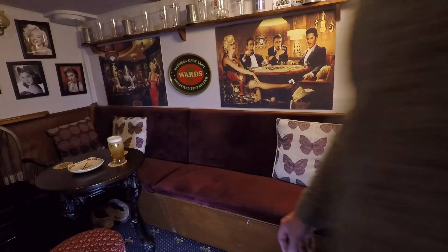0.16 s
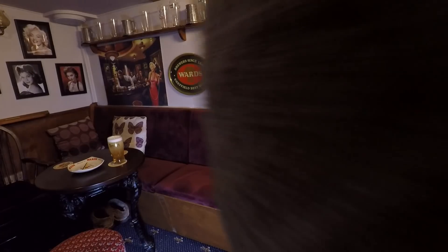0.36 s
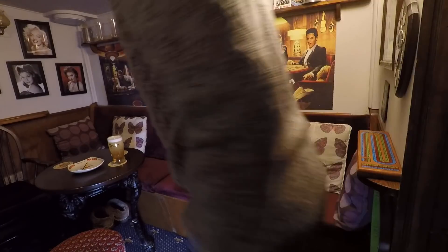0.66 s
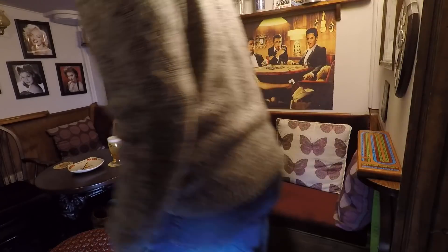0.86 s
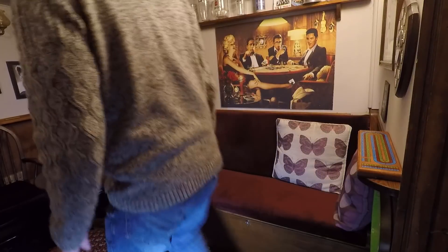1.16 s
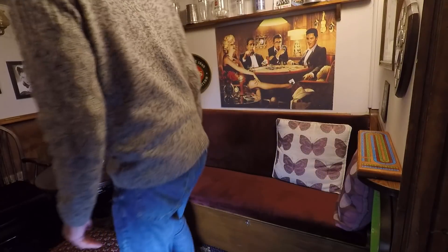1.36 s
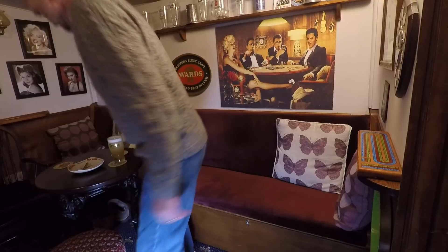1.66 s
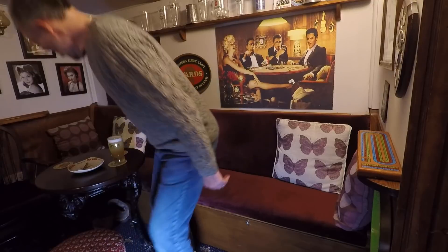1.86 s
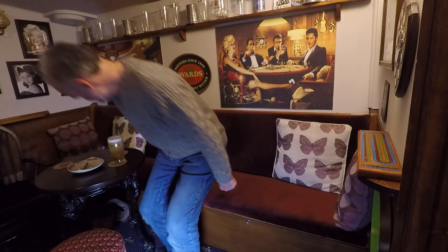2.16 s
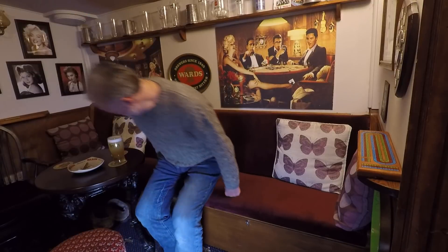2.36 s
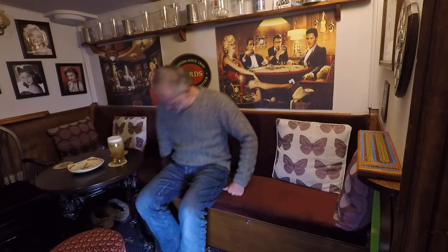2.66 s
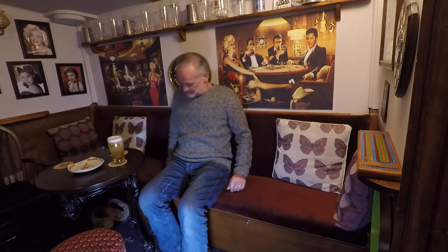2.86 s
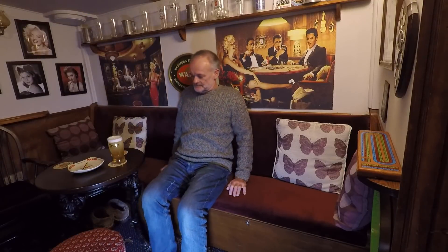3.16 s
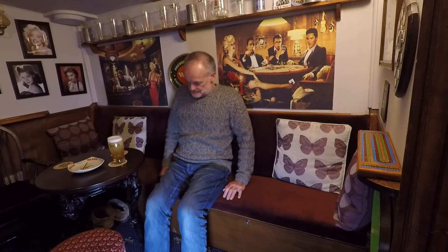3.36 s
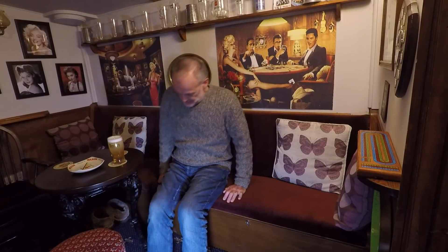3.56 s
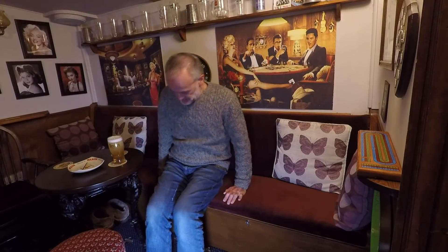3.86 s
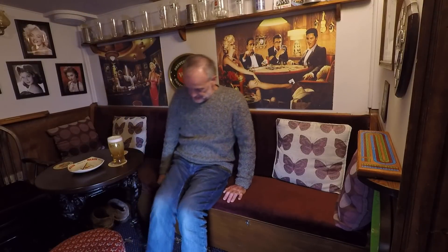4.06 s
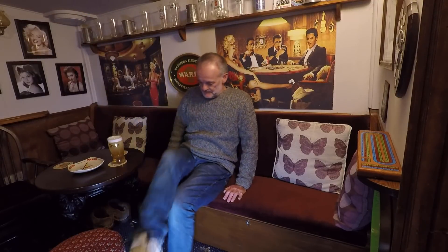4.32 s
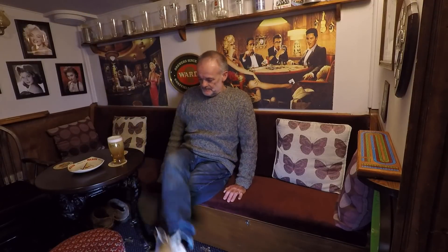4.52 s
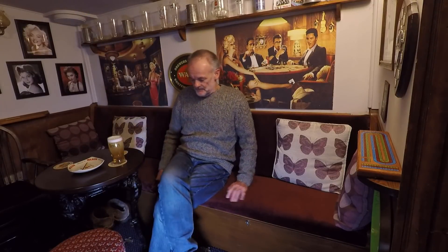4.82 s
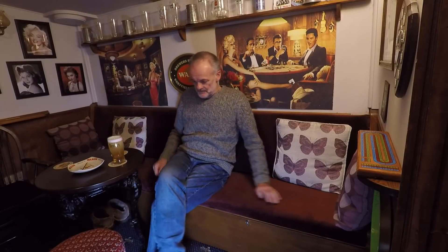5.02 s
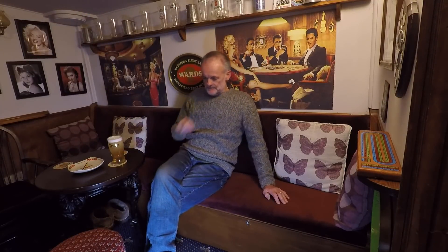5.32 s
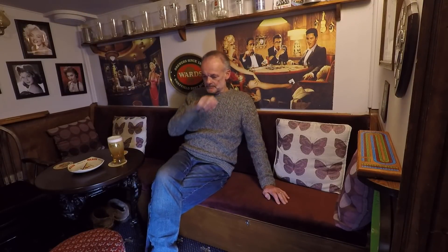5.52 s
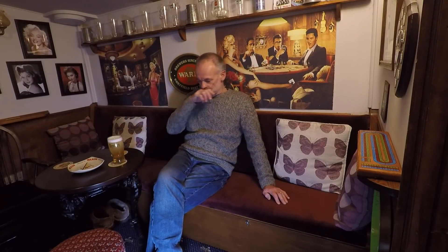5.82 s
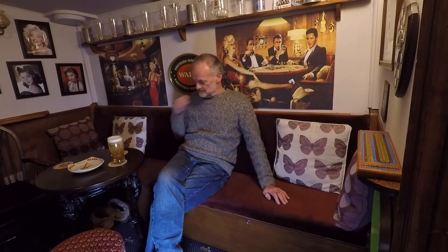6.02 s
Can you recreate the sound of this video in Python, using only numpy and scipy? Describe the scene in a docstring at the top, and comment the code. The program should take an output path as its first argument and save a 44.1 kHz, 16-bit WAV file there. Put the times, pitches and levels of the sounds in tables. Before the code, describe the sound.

In a small, muffled room, someone walks heavily over carpet, making the timber beneath knock and boom close to the microphone. They sit down on a cushioned wooden bench with a click and several deep, slightly overloaded thumps. Then their legs shift with softer knocks, cloth rustles, and a hand brushes briefly over velvet. A low hum, rumble and light hiss run throughout.

```python
"""Heavy steps on a carpeted, hollow timber floor; the walker drops onto a boxed bench and shifts his legs.
Each blow knocks the boards and booms the floor, out of phase at the two microphones.
Soles and cloth scuff, joints tick and creak, a hand rasps along the velvet seat.
Hum, rumble and microphone hiss lie underneath. The room is small and soft; the loudest booms clip."""
import sys
import numpy as np
from scipy import signal
from scipy.fft import rfft, irfft
from scipy.io import wavfile
from scipy.ndimage import uniform_filter1d

SR = 44100
rng = np.random.default_rng(int(sys.argv[2]) if len(sys.argv) > 2 else 0)


def transcribe(u):
    """Save the signal u as a 16-bit wav file named by the first command-line argument.

    u: samples, shape (n,) or (channels, n), limited to [-1, 1]; the rate is SR.
    q: integer samples, one column per channel.
    """
    v = np.clip(np.atleast_2d(u).T, -1, 1)
    q = np.round(v * 32767).astype(np.int16)
    wavfile.write(sys.argv[1], SR, q)


N = 272758
ANTIPHASE = np.array([[1], [-1]])


def undb(db):
    return 10 ** (np.asarray(db) / 20)


def unit_rms(x):
    return x / np.sqrt(np.mean(x ** 2))


def coloured(spectrum, tilt_db_per_oct=0.):
    """Unit-rms noise with a (frequency [Hz], density [dB]) spectrum, tilted about 2 kHz."""
    hz, db = np.transpose(spectrum)
    octave = np.log2(np.maximum(np.fft.rfftfreq(N, 1 / SR), 1))
    gain_db = np.interp(octave, np.log2(hz), db, left=-120, right=-120)
    gain_db += tilt_db_per_oct * (octave - np.log2(2000))
    return unit_rms(irfft(rfft(rng.standard_normal(N)) * undb(gain_db), N))


def wander(rate_hz):
    """Unit-rms ramps between random values."""
    hold = int(SR / rate_hz)
    steps = np.repeat(rng.standard_normal(N // hold + 1), hold)
    return unit_rms(uniform_filter1d(steps, hold)[:N])


def decay(t, t60_s):
    return np.exp(-np.log(1000) * t / t60_s)


def ring(t, hz, t60_s, phase_rad=0.):
    return np.sin(2 * np.pi * hz * t + phase_rad) * decay(t, t60_s)


def stereo(mid, side, correlation):
    """Left and right from two unrelated signals."""
    return np.sqrt((1 + correlation) / 2) * mid + np.sqrt((1 - correlation) / 2) * side * ANTIPHASE


def add(out, start_s, sound):
    i = int(start_s * SR)
    out[:, i:i + sound.shape[1]] += sound[:, :N - i]


def hiss():
    """Microphone hiss, wavering slightly."""
    # in-phase and antiphase spectra: (frequency [Hz], density [dB])
    mid_spectrum = [(76, -26), (130, -3), (200, -5), (380, -7), (650, -15), (1000, -17), (1700, -19.5),
                    (2300, -24), (3300, -25), (5000, -29.5), (6600, -25), (8500, -29), (11000, -32.5),
                    (13000, -41.5), (15000, -45)]
    side_spectrum = [(53, -40), (90, -16), (160, -6), (300, -13.5), (430, -14), (870, -15.5), (1230, -20),
                     (2000, -28), (3500, -39), (5000, -40), (6600, -32), (8500, -35.5), (11000, -39.5),
                     (13000, -48), (15000, -53)]
    mid = undb(-47 + 0.15 * wander(4.1)) * coloured(mid_spectrum)
    side = undb(-43.5 + 0.2 * wander(3.7)) * coloured(side_spectrum)
    return mid + side * ANTIPHASE


def hum(hz=47.6, width_hz=13):
    """Low tone in narrow-band noise, opposite at the two microphones."""
    # hum envelope: (time [s], level [dB])
    levels = [(0, -36), (.8, -28), (1.5, -29.5), (2.2, -30.5), (3, -29), (3.7, -30), (4.4, -37), (5, -33.5),
              (5.6, -30.5), (6.18, -42)]
    t, f = np.arange(N) / SR, np.fft.rfftfreq(N, 1 / SR)
    tone = np.sqrt(2) * np.sin(2 * np.pi * hz * t)
    band = irfft(rfft(rng.standard_normal(N)) / (1 + (2 * (f - hz) / width_hz) ** 2), N)
    return (tone + 0.9 * unit_rms(band)) * undb(np.interp(t, *np.transpose(levels))) * ANTIPHASE


def rumble():
    """The floor rumbles under a moving weight; mono."""
    # rumble spectrum: (frequency [Hz], density [dB])
    spectrum = [(15, -34), (25, 11), (50, 1.5), (80, 0), (130, -13.5), (300, -22), (500, -40)]
    # rumble envelope: (time [s], level [dB])
    levels = [(0, -41), (.8, -39.5), (1.3, -37.5), (1.7, -31.5), (2.2, -40.5), (2.75, -35.5), (3.3, -34.5),
              (3.8, -41.5), (4.05, -39.5), (4.5, -45), (5, -37), (5.5, -40.5), (5.8, -49), (6.18, -51.5)]
    return coloured(spectrum) * undb(np.interp(np.arange(N) / SR, *np.transpose(levels)))


def scuffs(grain_db=1.5):
    """Fibres drag over fibres: grainy noise, dull for soles, bright for cloth."""
    # strokes: (start [s], length [s], level [dB], tilt [dB/oct])
    strokes = [(-.07, 0.38, -47.5, 5), (0.259, 0.067, -36.5, -4), (0.915, 0.098, -39, -3.5),
               (1.129, 0.039, -45.5, 1.5), (1.506, 0.31, -51.5, -0.5), (1.77, 0.075, -45, -1.5),
               (2.339, 0.035, -26.5, -5), (2.446, 0.08, -42.5, -3.5), (2.555, .12, -48, -3),
               (2.932, 0.044, -40, -2.5), (3.187, 0.23, -52.5, 0), (3.65, 0.069, -57.5, 5),
               (4.092, 0.37, -50.5, 1.5), (4.514, .09, -40, 0.5), (4.604, 0.12, -50, 2),
               (5.055, 0.029, -44.5, -4.5), (5.85, 0.11, -55.5, -4)]
    # spectrum before tilt: (frequency [Hz], density [dB])
    spectrum = [(400, 10), (1000, 8), (2500, 6), (4500, -2), (6800, 1), (9000, -11.5), (12000, -30),
                (15000, -37)]
    rise, hold = 0.2, 0.52  # shares of the length
    out, t = np.zeros((2, N)), np.arange(N) / SR
    dull, bright = (stereo(coloured(spectrum, tilt), coloured(spectrum, tilt), 0.6) for tilt in (-5, 5))
    for start_s, length_s, db, tilt in strokes:
        progress = (t - start_s) / length_s
        attack = np.clip(progress / rise, 0, 1) ** 2
        release = np.exp(-3 * np.maximum(progress - rise - hold, 0))
        brightness = np.clip(.5 + tilt / 10, 0, 1)
        noise = np.sqrt(1 - brightness) * dull + np.sqrt(brightness) * bright
        out += undb(db) * attack * release * noise
    return out * undb(grain_db * wander(150))


def ticks(t60_s=0.014, snap_db=-7.5):
    """Joints tick: a damped ring, its overtone and a dull snap."""
    # joint ticks: (time [s], level [dB], pitch [Hz])
    events = [(0.0994, -37, 1690), (0.267, -34, 1160), (0.2993, -27, 1770), (0.9518, -33, 1090),
              (0.97, -25.5, 1670), (1.1417, -32.5, 2330), (1.661, -33, 910), (1.819, -38, 1950),
              (2.3494, -13.5, 1740), (2.4752, -40, 1190), (2.585, -32, 1670), (2.942, -33, 2330),
              (4.634, -33.5, 2630), (5.0603, -29, 1330)]
    out, t = np.zeros((2, N)), np.arange(4000) / SR
    for start_s, db, hz in events:
        noise = stereo(*rng.standard_normal((2, len(t))), 0.2)
        snap = signal.lfilter(*signal.butter(4, 6000, fs=SR), noise) * np.exp(-t / 0.0011)
        tone = ring(t, hz, t60_s) + 0.55 * ring(t, 1.326 * hz, t60_s)
        add(out, start_s, undb(db) * (tone + undb(snap_db) * snap))
    return out


def knocks(slope_db_per_oct=11.5, rise_s=0.0036):
    """A push and its rolling after-bumps drive the board modes."""
    # board modes: (frequency [Hz], level [dB], t60 [s])
    modes = [(112.1, -3, 0.16), (141.46, -24.5, 0.61), (166.6, -4.5, 0.11), (198.4, -3, 0.058),
             (240, -3, 0.083), (286.2, -7, 0.091), (302.4, -7, 0.057), (352.7, -5, 0.054),
             (452, -3.5, 0.049), (516, -8, 0.081), (597, -5.5, 0.056), (695, -8, 0.12), (751, -6, 0.044)]
    # blows: (time [s], left [dB], right [dB], centre [Hz], contact [s], roll [s])
    blows = [(.259, -6.5, 3.5, 195, 0.0025, 0.028), (0.278, -11.5, -5.5, 328, .0026, 0.0084),
             (.393, -21, -19.5, 403, .0024, 0.012), (0.929, -19, -12.5, 127, 0.0018, 0.017),
             (.949, -13, -9, 293, 0.0018, .008), (.963, -13.5, -13, 298, 0.0017, 0.011),
             (1.653, -32.5, -24.5, 580, 0.0031, .0037), (1.785, -29.5, -16, 267, 0.0027, 0.038),
             (2.334, -16, -2, 150, 0.0034, 0.025), (2.35, -4.5, -3.5, 286, .0016, 0.0091),
             (2.468, -19.5, -13.5, 151, 0.001, 0.08), (2.579, -10, -3.5, 248, 0.0027, 0.017),
             (2.852, -6.5, 2.5, 151.6, 0.00071, 0.007), (2.942, -18.5, -15, 111, 0.0022, .02),
             (3.326, -22, -18, 119, 0.00079, 0.046), (4.2123, -14, -7.5, 166, 0.0019, 0.03),
             (4.523, -25.5, -23, 208, 0.0015, 0.082), (4.596, -24, -20, 129, 0.0026, 0.089),
             (5.058, -32, -33, 720, 0.00098, 0.0052), (5.136, -10, -3, 162.5, 0.0012, 0.035)]
    out, t = np.zeros((2, N)), np.arange(SR // 2) / SR
    hz, db, t60_s = np.transpose(modes)[:, :, None]
    for start_s, left_db, right_db, centre_hz, contact_s, roll_s in blows:
        # each spot of the floor drives the modes differently
        scatter = rng.standard_normal((2, 2, len(modes), 1))
        spot_db = db - slope_db_per_oct * abs(np.log2(hz / centre_hz)) + 1.5 * scatter[:, 0]
        spot_hz = hz * (1 + 0.0361 * scatter[:, 1])
        boards = np.sum(undb(spot_db) * ring(t, spot_hz, t60_s), axis=1)
        boards *= 1 - np.exp(-t / rise_s)  # bending wave spreads
        bumps = (rng.random((2, 4000)) < .006) * rng.standard_normal((2, 4000))
        bumps *= .22 * np.exp(-t[:4000] / roll_s)
        bumps[:, 0] = 1  # main push
        pulse = np.hanning(int(contact_s * SR) + 3)[None]
        force = signal.fftconvolve(bumps, pulse, axes=1)
        knock = signal.fftconvolve(force, boards, axes=1)
        knock /= np.max(abs(knock), axis=1, keepdims=True)
        add(out, start_s, undb([[left_db], [right_db]]) * stereo(*knock, correlation=0.27))
    return out


def booms():
    """The hollow floor swells and rings; the microphones sit on opposite sides of its low waves."""
    # floor booms: (time [s], left [dB], right [dB], pitch [Hz], rise [s], t60 [s], left lead [rad])
    events = [(0.26, -5, 1.5, 59.2, 0.039, 1.11, 2.75), (0.484, -44, -15, 58.6, 0.011, 0.6, 2.8),
              (.93, -2, 3.5, 62.7, .0094, 0.69, 4.12), (1.654, -27.5, -21.5, 63.4, 0.027, 0.4, 3.5),
              (1.787, -9, -14.5, 62.2, 0.019, 0.92, 2.93), (2.334, 0.5, 5, 60.73, 0.057, 0.89, 3.65),
              (2.467, -14, -5.5, 62.2, 0.051, 0.54, 1.8), (2.578, 2, 5, 62.7, 0.022, 0.19, 3.95),
              (2.854, 0.5, .5, 69.3, 0.049, 0.58, 2.03), (2.942, -3, -3, 58.85, 0.0077, 0.51, 2.1),
              (3.326, -7, 2.5, 62.3, 0.073, 0.3, 4.8), (4.2125, -19, -18, 66.9, 0.028, .68, 1.64),
              (4.596, -11, -6, 61.5, 0.017, 1, 2.7), (5.138, -6, -14, 64.8, 0.028, 0.67, 2.04)]
    out, t = np.zeros((2, N)), np.arange(SR) / SR
    for start_s, left_db, right_db, hz, rise_s, t60_s, lead_rad in events:
        main = undb([[left_db], [right_db]]) * ring(t, hz, t60_s, np.array([[lead_rad], [0]]))
        lower_gain = undb([[left_db - 2], [left_db - 35]])
        lower = lower_gain * ring(t, .75 * hz, 0.51 * t60_s, np.array([[np.pi], [0]]))
        swell = 1 - np.exp(-(t / rise_s) ** 2)
        add(out, start_s, (main + lower) * swell)
    return out


def creaks(pitch_waver=0.013, rough_db=5):
    """A sticking joint sings briefly, wavering in pitch and level."""
    # seat creaks: (start [s], length [s], pitch [Hz], level [dB])
    events = [(2.606, .04, 1314, -42.5), (2.66, 0.031, 1297, -50), (4.738, 0.063, 2800, -51)]
    out = np.zeros((2, N))
    bend = 1 + pitch_waver * wander(90)
    roughness = undb(rough_db * wander(200))
    for start_s, length_s, hz, db in events:
        span = slice(int(start_s * SR), int((start_s + length_s) * SR))
        tone = np.sin(2 * np.pi * np.cumsum(hz * bend[span]) / SR)
        out[:, span] += undb(db) * tone * roughness[span] * np.hanning(len(tone))
    return out


def rasp(start_s=4.785, end_s=5.05, ramp_s=0.036, sag_db_per_s=37):
    """Velvet pile flicks back under a palm that slows, then lifts: grainy, narrow hiss."""
    # rasp band: (frequency [Hz], density [dB])
    band = [(1100, -23), (1600, -13), (1850, -10), (2300, -7.5), (2650, -14), (3000, -38)]
    t = np.arange(N) / SR
    gate = np.clip(np.minimum(t - start_s, end_s - t) / ramp_s, 0, 1)
    db = -46.5 - sag_db_per_s * np.maximum(t - start_s, 0) + 1.8 * wander(84)
    return gate * undb(db) * stereo(coloured(band), coloured(band), 0.61)


def room(x, wet_db, t60_s=0.29, predelay_s=0.0038):
    """Direct sound plus a short diffuse tail that dulls as it fades."""
    t = np.arange(SR // 2) / SR
    noise = rng.standard_normal((2, len(t)))
    dull = signal.lfilter([.3], [1, -.7], noise)
    tail = dull * decay(t, t60_s) + 0.53 * noise * decay(t, 0.19 * t60_s)
    tail *= np.clip(t / predelay_s - 1, 0, 1)
    tail /= np.sqrt(np.sum(tail ** 2, axis=1, keepdims=True))
    return x + undb(wet_db) * signal.fftconvolve(x, tail, axes=1)[:, :N]


def scene():
    friction = scuffs() + rasp()
    floor = booms() + room(knocks(), wet_db=-14)
    joints = room(ticks() + creaks(), wet_db=-10)
    return floor + joints + room(friction, wet_db=-6.5) + hum() + rumble() + hiss()


def record(dry):
    """Converter clipping at full scale, then a 15 kHz low-pass."""
    lowpass = signal.ellip(10, .2, 80, 15000, fs=SR, output="sos")
    return signal.sosfilt(lowpass, np.clip(dry, -1, 1))


dry = scene()
out = record(dry)
transcribe(out)
```